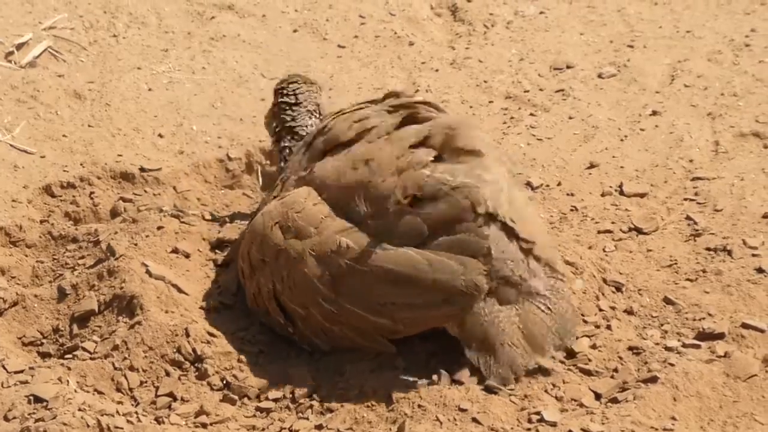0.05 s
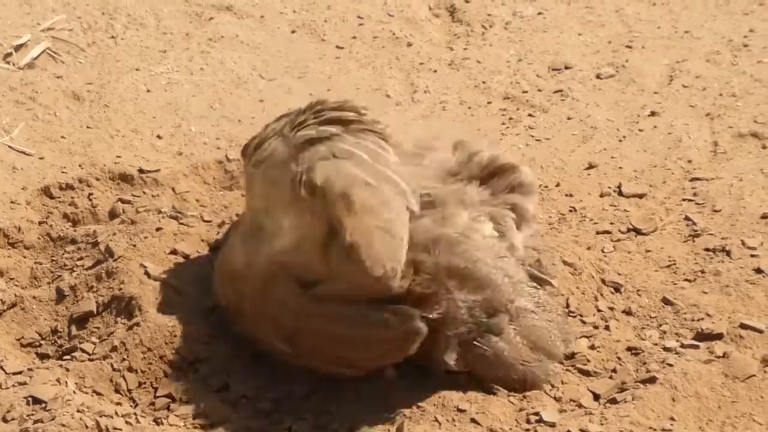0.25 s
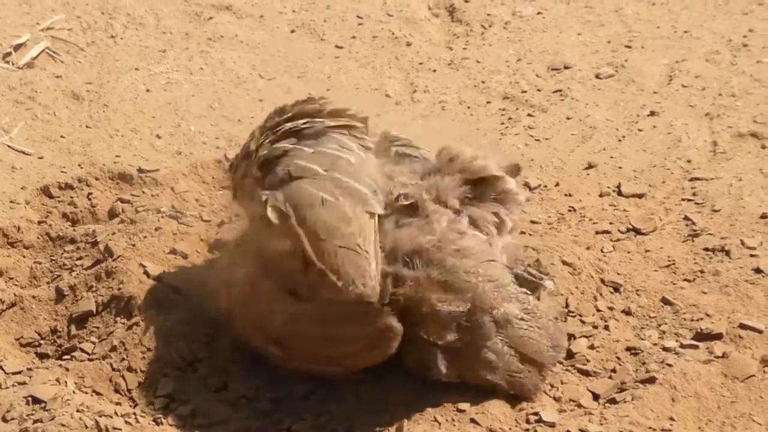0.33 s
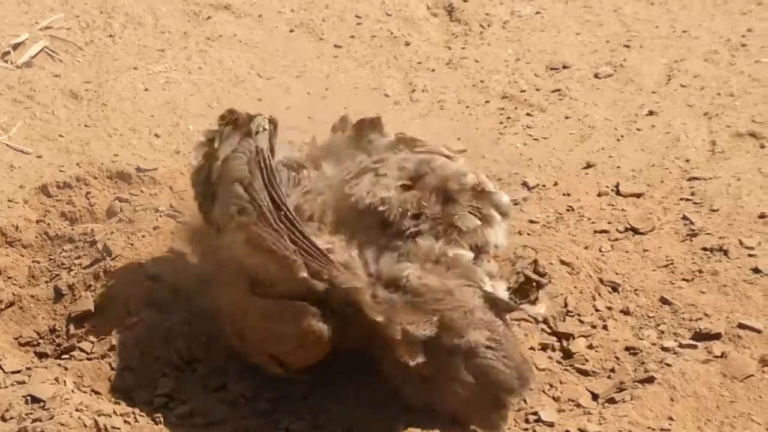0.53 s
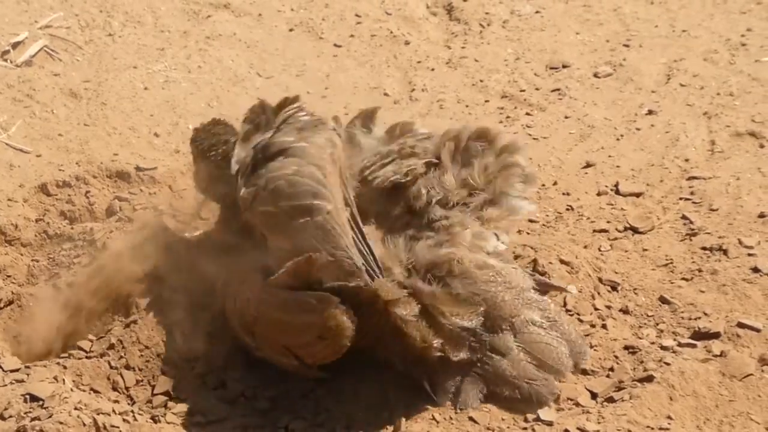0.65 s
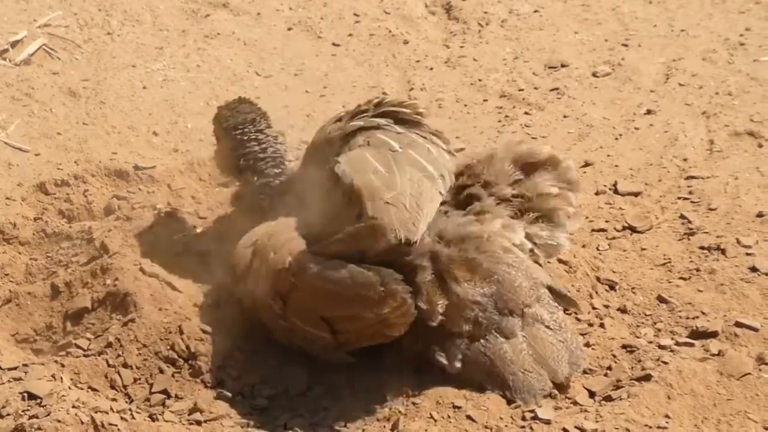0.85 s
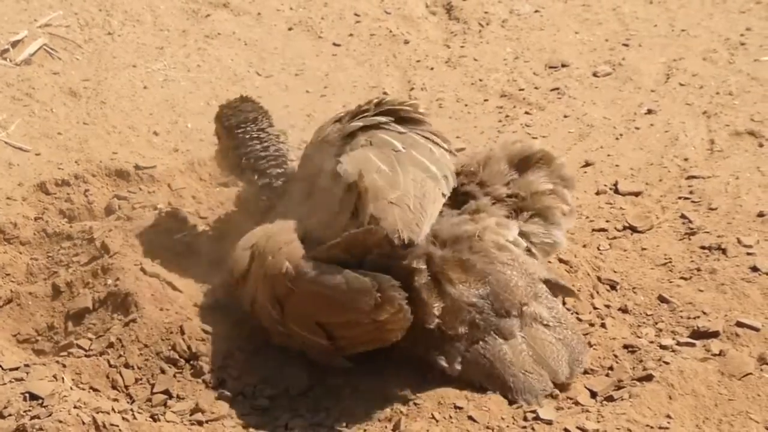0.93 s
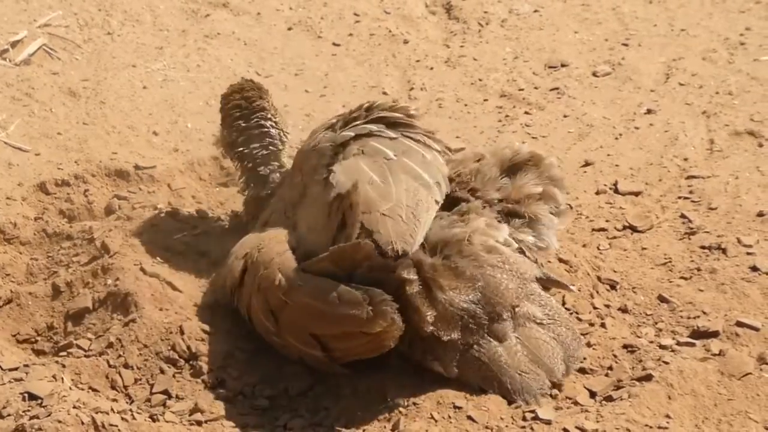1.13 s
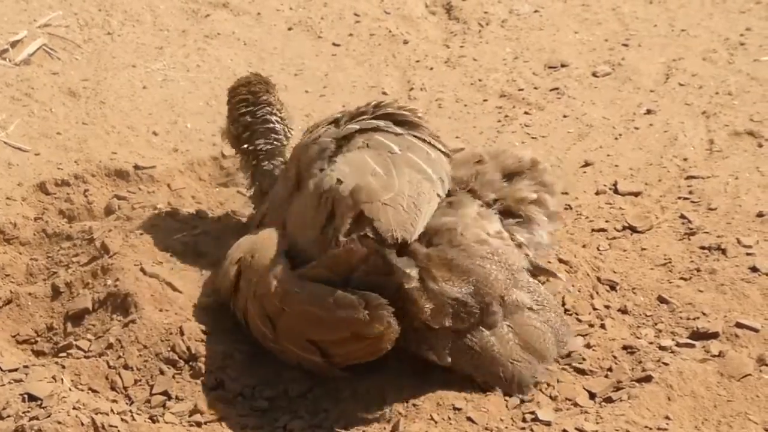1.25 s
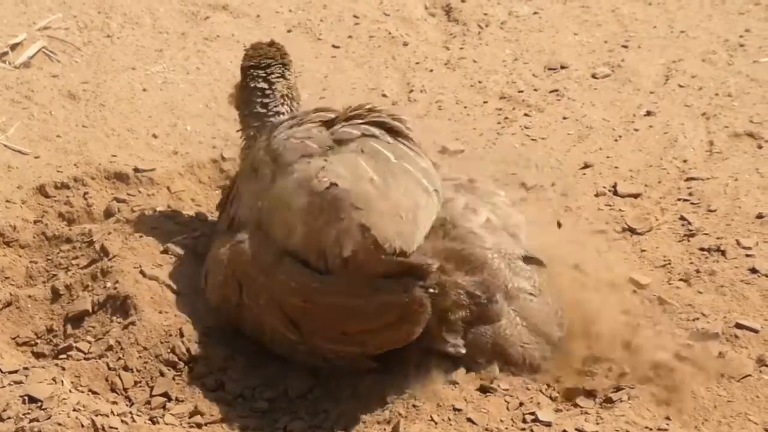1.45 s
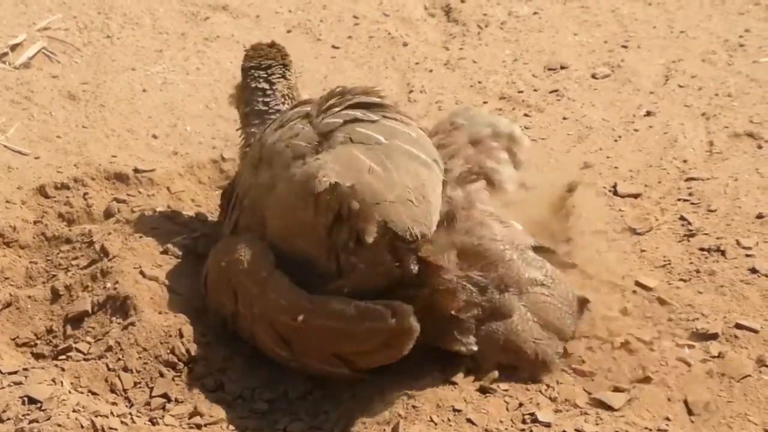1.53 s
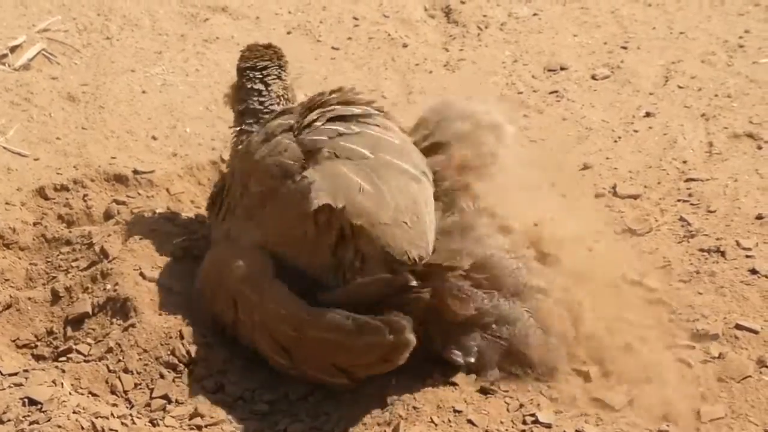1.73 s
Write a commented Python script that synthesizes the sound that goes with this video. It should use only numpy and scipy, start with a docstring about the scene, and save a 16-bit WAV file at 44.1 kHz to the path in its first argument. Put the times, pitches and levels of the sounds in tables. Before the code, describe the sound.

A bird dust-bathes close to the microphone, its feathers fluttering with dull wing thumps. A quick flurry of beats eases into lighter shuffles and a faint patter of soil. Small birds chirp far off in light wind.

```python
"""Dull thumps, a low flutter of feathers and pattering soil: a ground bird dust-bathes close by.
Wing and body beats shove the air, shaken feathers churn it, flung dry soil lands as grains.
Small birds whistle far off in light wind, with a raspy high hiss around their opening calls.
A limiter dips the level on the hardest beats and recovers slowly."""
import sys
import numpy as np
from scipy import signal
from scipy.fft import rfft, irfft
from scipy.io import wavfile

SR = 44100
rng = np.random.default_rng(int(sys.argv[2]) if len(sys.argv) > 2 else 0)


def waveform_to_disk(signal):
    """Save audio, clipped to [-1, 1], as 16-bit WAV at the path in sys.argv[1]."""
    frames = np.transpose(np.atleast_2d(signal))
    scaled = np.clip(frames, -1, 1) * 32767
    samples = np.round(scaled).astype(np.int16)
    wavfile.write(sys.argv[1], SR, samples)


N = 79380
T = np.arange(N) / SR
HZ = np.fft.rfftfreq(N, 1 / SR)
FLICKER_HZ, FEATHER_RISE_S = 57.7, .0069

# feather noise between the channels: f/Hz, L-R correlation
FEATHER_CORRELATION = [(60, 1), (150, 0.74), (300, 0.21), (600, -0.45), (1400, -0.86)]


def amp(db):
    """dB to gain."""
    return 10 ** (np.asarray(db) / 20)


def unit_rms(x):
    """Scale to rms 1."""
    return x / np.sqrt(np.mean(x ** 2) + 1e-20)


def curve(points):
    """Rows of (f/Hz, value) interpolated to every FFT bin over log f."""
    f, value = np.transpose(points)
    return np.interp(np.log(HZ + 1), np.log(f + 1), value)


def pan(pan_db):
    """Left and right gains; positive is left."""
    return amp(np.array([[.5], [-.5]]) * pan_db)


def drift(rate_hz):
    """Smooth random wander, rms 1."""
    return unit_rms(irfft(rfft(rng.standard_normal(N)) * np.exp(-(HZ / rate_hz) ** 2) * (HZ > 0), N))


def noise(spectrum, correlation, pan_db):
    """Coloured stereo noise, rms 1."""
    left, other = rfft(rng.standard_normal((2, N)))
    c = np.clip(curve(correlation), -1, 1)
    right = c * left + np.sqrt(1 - c ** 2) * other
    return unit_rms(irfft(np.array([left, right]) * amp(curve(spectrum)) * pan(pan_db), N))


def gate(start_s, length_s, rise_s, fall_s):
    """Envelope with quarter-sine edges."""
    ramp = np.minimum((T - start_s) / rise_s, (start_s + length_s - T) / fall_s)
    return np.sin(np.pi / 2 * np.clip(ramp, 0, 1))


def bouts(rows, rise_s, fall_s):
    """Envelope of rows (t/s, length/s, level/dB), summed in power."""
    return np.sqrt(sum((amp(db) * gate(t, length, rise_s, fall_s)) ** 2 for t, length, db in rows))


def tone(hz, warble=0):
    """Sine with a fractional pitch deviation."""
    return np.sin(2 * np.pi * np.cumsum(hz * (1 + warble)) / SR)


def air():
    """Light wind and faint, steady outdoor hiss."""
    # wind and hiss spectrum: f/Hz, relative density/dB
    spectrum = [(22, -36), (66, -1), (115, -5), (152, 6), (200, 0), (333, -4.5), (781, -8), (1130, -16.5),
                (1690, -18), (2330, -16), (2970, -21.5), (3480, -17), (4540, -24.5), (6090, -25.5),
                (14700, -36)]
    # stereo likeness: f/Hz, L-R correlation
    correlation = [(60, .2), (130, 0.36), (600, -0.14), (1370, -0.14), (3000, 0.12), (6500, 0.64),
                   (14000, 0.51)]
    # stereo balance: f/Hz, L-R/dB
    balance = [(60, 0.5), (700, -4.5), (4000, -4.5), (8000, 1.5)]
    return amp(-67.5) * noise(spectrum, correlation, curve(balance))


def soil_and_rasp(grains_per_s=6000, spread_db=2, width=.22, clump_db=1.5, clump_hz=150):
    """Grainy swells: sprays of soil landing in clumps, and a raspy hiss around the opening calls."""
    # first row raspy high hiss, the others sprays of soil: t/s, length/s, level/dB
    swells = [(.03, .17, -75), (-.1, 0.5, -77), (.45, 0.7, -80.5), (1.04, 0.045, -80), (1.42, 0.22, -80),
              (1.655, .13, -74), (1.69, .2, -76)]
    # grain spectrum: f/Hz, relative density/dB
    spectrum = [(500, -22), (1400, -2), (2200, 2.5), (2900, -5.5), (3800, 3), (5500, -1.5), (7500, -18.5),
                (14000, -24)]
    size = amp(spread_db * np.minimum(rng.exponential(1, (2, N)), 4))
    mid, side = size * rng.standard_normal((2, N)) * (rng.random((2, N)) < grains_per_s / SR)
    grains = irfft(rfft([mid + width * side, mid - width * side]) * amp(curve(spectrum)), N)
    clumps = unit_rms(grains * amp(clump_db * drift(clump_hz)))
    power = sum((amp(db) * gate(t, length, .25 * length, .75 * length)) ** 2 for t, length, db in swells)
    return clumps * np.sqrt(power)


def flutter(flicker_db=2):
    """Shaken feathers churn the air in uneven low puffs."""
    # feather shuffles: t/s, length/s, level/dB
    shuffles = [(-.02, 0.033, -45), (.043, 0.026, -49.5), (.187, 0.058, -50.5), (.303, 0.043, -52),
                (.345, 0.1, -51), (.392, 0.095, -41), (.478, 0.058, -41), (.527, 0.086, -40),
                (.625, 0.095, -49.5), (.712, 0.053, -52), (.765, 0.084, -47.5), (.848, 0.086, -46.5),
                (.943, 0.066, -53.5), (1.028, 0.068, -52), (1.316, 0.03, -61), (1.395, 0.12, -60),
                (1.46, 0.07, -52), (1.528, 0.079, -53), (1.59, 0.04, -53)]
    # flutter spectrum: f/Hz, relative density/dB
    spectrum = [(40, -38.5), (70, -6.5), (140, 3), (220, -2.5), (350, -11), (550, -20), (900, -32),
                (2000, -67)]
    churn = noise(spectrum, FEATHER_CORRELATION, pan_db=1)
    puffs = unit_rms(churn * amp(flicker_db * drift(FLICKER_HZ)))
    return puffs * bouts(shuffles, FEATHER_RISE_S, fall_s=.031)


def slurs(warble, bend=.02):
    """Far birds slide from pitch to pitch in slightly arched notes."""
    # slurred notes: t/s, length/s, level/dB, first f/Hz, last f/Hz
    notes = [(-.02, .10, -75, 1980, 2216), (.034, 0.0466, -66.5, 4560, 4100),
             (.06, 0.065, -69.5, 4300, 3664), (0.135, 0.022, -71, 4250, 4200),
             (0.129, 0.028, -68, 2600, 2700), (.15, .012, -71, 2600, 1300), (0.177, 0.019, -71, 3250, 3000),
             (.254, .016, -74.5, 3100, 1600), (0.274, .07, -75, 1480, 1230),
             (0.442, 0.068, -75, 2294, 2580), (.515, 0.042, -76.5, 5270, 4400),
             (.102, .018, -68.5, 3800, 3700), (0.553, 0.091, -76.5, 2304, 2483),
             (1.741, 0.013, -71, 2100, 1800)]
    out = np.zeros(N)
    for start_s, length_s, db, first_hz, last_hz in notes:
        u = np.clip((T - start_s) / length_s, 0, 1)
        arch = np.sin(np.pi * u)
        hz = (first_hz + (last_hz - first_hz) * u) * (1 + bend * arch)
        out += amp(db) * arch * tone(hz, warble)
    return out


def twitter(count=130, level_db=-81, length_s=.014, low_hz=2020, high_hz=5310, glide=.11):
    """The farthest birds: faint gliding chirps at random times and pitches."""
    out = np.zeros(N)
    for when, pitch, slope in rng.random((count, 3)):
        u = (T - when * T[-1]) / length_s
        near = abs(u) < .5
        centre_hz = low_hz * (high_hz / low_hz) ** pitch
        hz = centre_hz * (1 + 2 * glide * (2 * slope - 1) * u[near])
        out[near] += amp(level_db) * np.cos(np.pi * u[near]) * tone(hz)
    return out


def thumps(roundness=4, lag_s_per_db=.00012):
    """Each beat shoves the air in one sharp-peaked pulse, with no net flow and no ring."""
    # wing and body beats: t/s, level/dB, f/Hz, L-R/dB
    beats = [(0.05, -48, 251, 3.5), (.063, -45.5, 123, 4.5), (.196, -41, 270, 7.5), (0.2133, -30, 215, 6),
             (0.359, -38, 358, -7.5), (0.4112, -22.3, 180, -5.5), (.4125, -34, 480, -7),
             (.4375, -37, 450, -5), (.451, -40, 420, 3), (.4845, -33.5, 720, -4), (0.4882, -22, 360, -7),
             (.4952, -25, 350, -9), (0.5335, -32, 200, 5), (0.5415, -29.5, 200, 5), (0.5461, -28, 237, -8),
             (0.5553, -33, 330, -5), (0.5808, -28.5, 270, -4.5), (0.6141, -26, 310, 9),
             (0.6245, -34, 290, -7.5), (0.6865, -41, 273, 5.5), (0.7726, -43.5, 280, -10),
             (0.8248, -35, 270, -9), (0.8525, -40, 353, 8.5), (0.8907, -37, 269, -8),
             (0.9058, -30.5, 280, 7), (0.9098, -29.5, 265, 7.5), (1.4805, -38.5, 288, -9),
             (1.487, -39, 160, 1), (1.56, -31.5, 275, -9), (1.578, -35, 150, 3.5)]
    out = np.zeros((2, N))
    for peak_s, db, hz, pan_db in beats:
        near = abs(T - peak_s) < .03
        # an off-centre beat sounds slightly later in its louder channel, widening the thump
        lag_s = np.array([[.5], [-.5]]) * pan_db * lag_s_per_db
        phase = 2 * np.pi * hz * (T[near] - peak_s - lag_s)
        shove = -((1 - 1j * phase / (roundness + .5)) ** -(roundness + 1)).real
        out[:, near] += amp(db) * pan(pan_db) * shove
    return out


def swishes(edge_s=.0038):
    """Stiff flight feathers rush through the air."""
    # big wing strokes: t/s, length/s, level/dB
    strokes = [(.356, 0.027, -63.5), (.406, 0.019, -43), (.480, 0.0217, -40), (.526, 0.033, -43),
               (.572, 0.02, -46), (.606, 0.018, -47), (.817, .014, -59), (.85, 0.07, -63.5)]
    # swish spectrum: f/Hz, relative density/dB
    spectrum = [(60, -52), (250, -14.5), (520, 6.5), (850, -7.5), (1200, -12), (1700, -29.5), (4000, -58.5)]
    return noise(spectrum, FEATHER_CORRELATION, pan_db=-2.5) * bouts(strokes, edge_s, edge_s)


def crumbs(edge_s=.0023, top_hz=7500):
    """A few larger crumbs of soil tick as they land."""
    # crumb impacts: t/s, level/dB
    impacts = [(0.408, -64), (1.054, -62.5), (1.07, -63), (1.572, -68)]
    envelope = sum(amp(db) * np.exp(-abs(T - t) / edge_s) for t, db in impacts)
    return irfft(rfft(envelope * rng.standard_normal(N)) / (1 + (HZ / top_hz) ** 4), N)


def whistle(level_db=-76, fade_db=-5, edge_s=.03):
    """A far bird's thin whistle lifts briefly, then falls and fades."""
    # pitch contour: t/s, f/Hz
    contour = [(.86, 7900), (0.887, 8350), (0.926, 8270), (0.94, 8000), (.968, 7930), (0.986, 7640),
               (1.003, 7650), (1.015, 7310), (1.061, 7200)]
    t, hz = np.transpose(contour)
    length_s = t[-1] - t[0]
    u = np.clip((T - t[0]) / length_s, 0, 1)
    envelope = gate(t[0], length_s, edge_s, edge_s) * amp(level_db + fade_db * u ** 2)
    return envelope * tone(np.interp(T, t, hz))


def thrum(start_s=1.049, length_s=.032, level_db=-42.5, hz=238):
    """A shaken wing vibrates for a few even cycles."""
    envelope = amp(level_db) * gate(start_s, length_s, FEATHER_RISE_S, FEATHER_RISE_S)
    return pan(5) * envelope * tone(hz, warble=.03 * drift(FLICKER_HZ))


def peeps(warble, length_s=.021, rise=.17):
    """One far bird repeats a short rising note."""
    # peeps: t/s, level/dB, top f/Hz
    notes = [(1.123, -75, 3600), (1.238, -69, 3620), (1.296, -70.5, 3580), (1.413, -71.5, 3520),
             (1.473, -73, 3530), (1.645, -75, 3420), (1.686, -71, 3430)]
    out = np.zeros(N)
    for start_s, db, top_hz in notes:
        u = np.clip((T - start_s) / length_s, 0, 1)
        out += amp(db) * np.sin(np.pi * u) * tone(top_hz * (1 - rise * (1 - u) ** 3), warble)
    return out


def scattered(song, echo_db=-4, t60_s=.4):
    """The surroundings add a diffuse stereo tail to far calls."""
    tail = rng.standard_normal((2, N)) * np.exp(-np.log(1000) * T / t60_s)
    echo = signal.fftconvolve(song[None], tail / np.linalg.norm(tail[0]), axes=1)[:, :N]
    return song + amp(echo_db) * echo


def scene(low_cut_hz=66.4):
    """The bathing bird, its deepest bass cut by the microphone, against the quiet outdoors."""
    low_cut = signal.butter(4, low_cut_hz, "high", fs=SR, output="sos")
    bird = signal.sosfilt(low_cut, thumps() + thrum() + flutter())
    rustle = swishes() + soil_and_rasp() + crumbs()
    warble = .03 * drift(rate_hz=120)
    song = slurs(warble) + twitter() + whistle() + peeps(warble / 2)
    return bird + rustle + scattered(song) + air()


def record(dry, limit_db=-24.5, attack_s=.003, recover_db_per_s=21.5, top_hz=14900):
    """Limiter with fast attack and slow recovery, then a steep low-pass."""
    over_db = np.maximum(20 * np.log10(abs(dry).max(0) + 1e-9) - limit_db, 0)
    recovery_db = T * recover_db_per_s
    held_db = np.maximum.accumulate(over_db + recovery_db) - recovery_db
    pole = np.exp(-1 / (attack_s * SR))
    ducked = dry * amp(-signal.lfilter([1 - pole], [1, -pole], held_db))
    low_pass = signal.firwin(511, top_hz, window=("kaiser", 9), fs=SR)
    return signal.oaconvolve(ducked, low_pass[None], "same")


dry = scene()
out = record(dry)
waveform_to_disk(out)
```